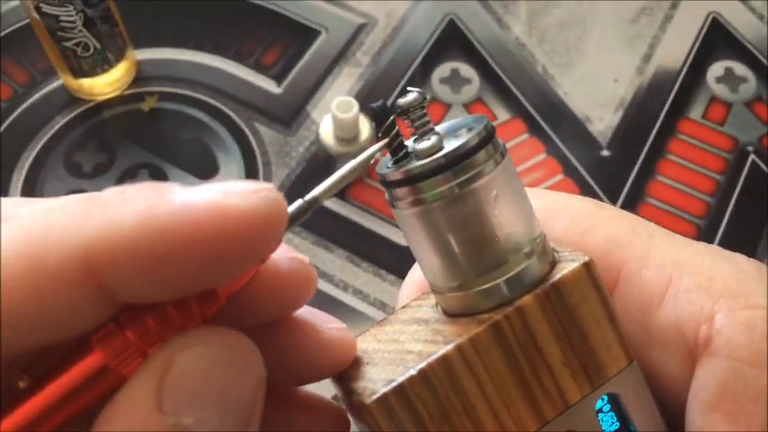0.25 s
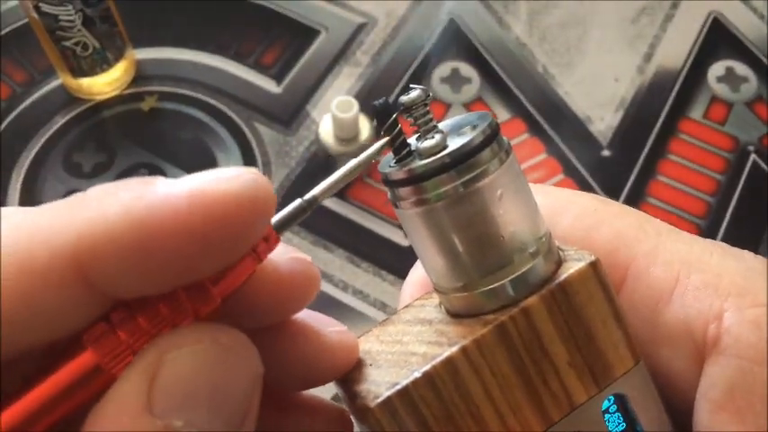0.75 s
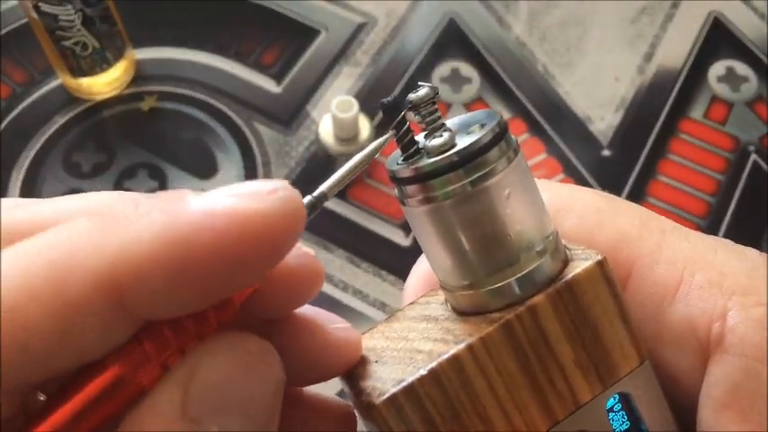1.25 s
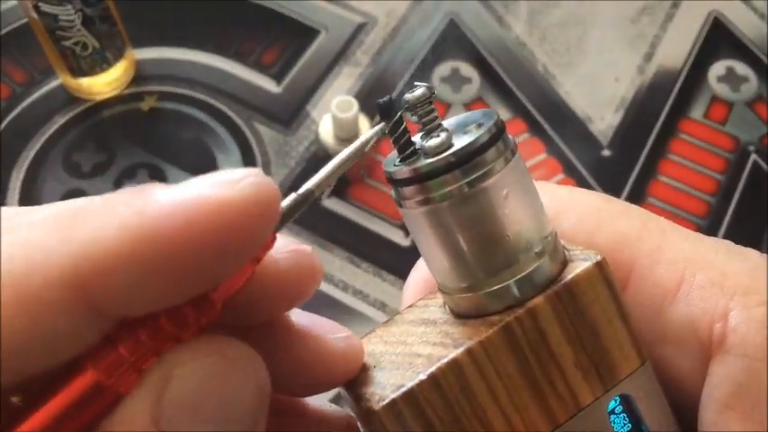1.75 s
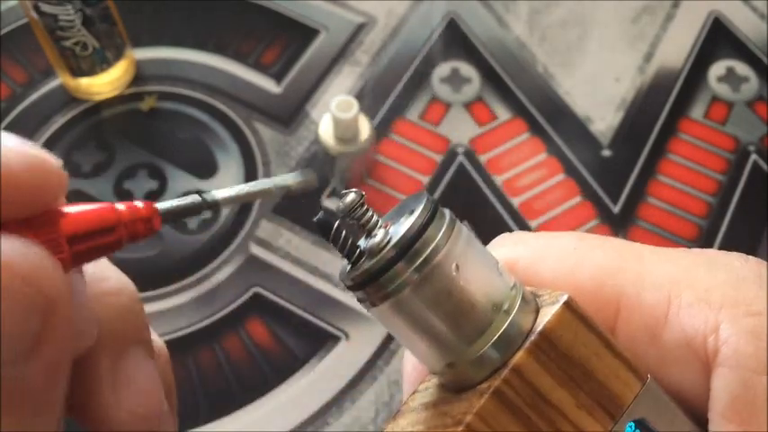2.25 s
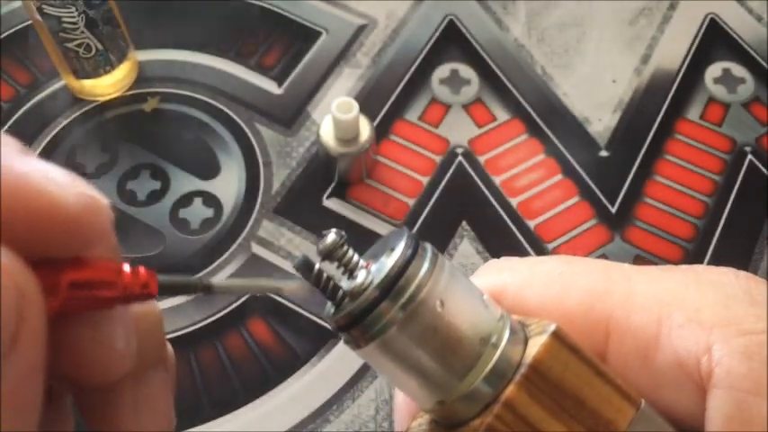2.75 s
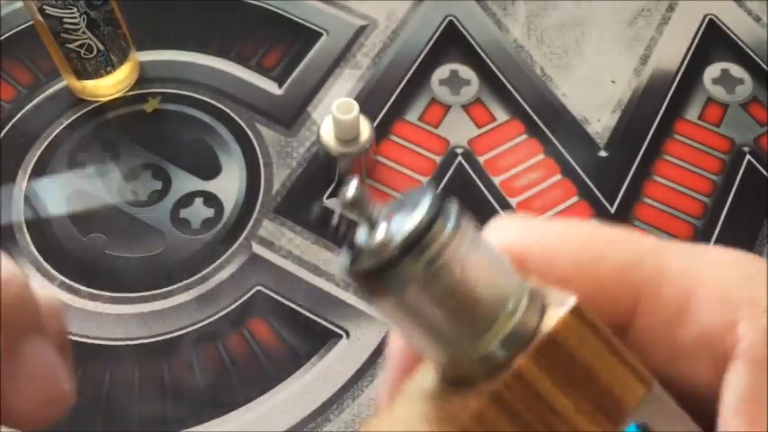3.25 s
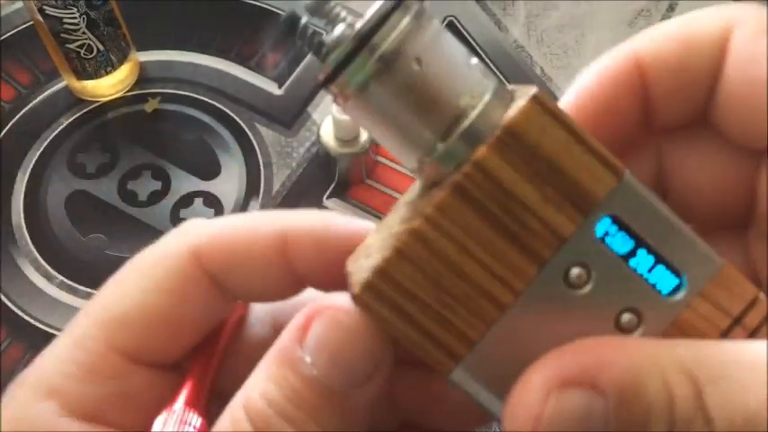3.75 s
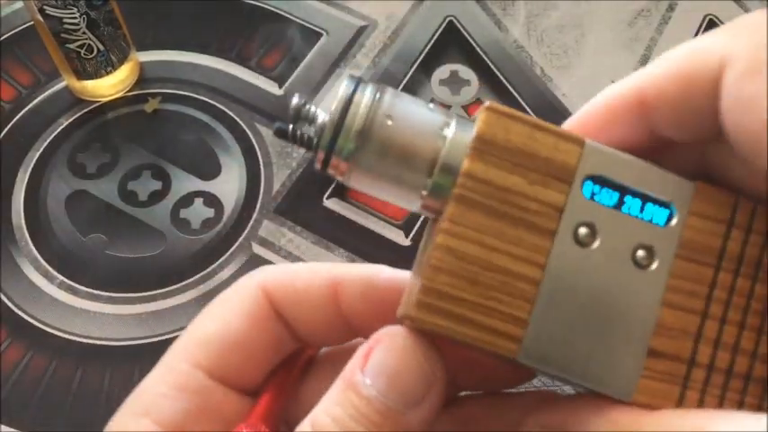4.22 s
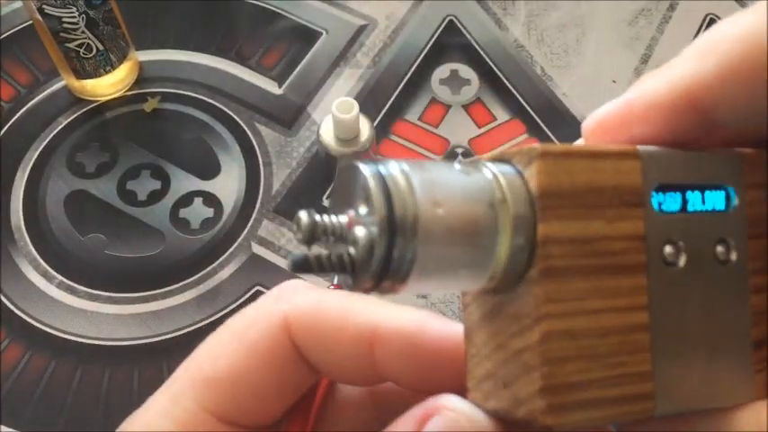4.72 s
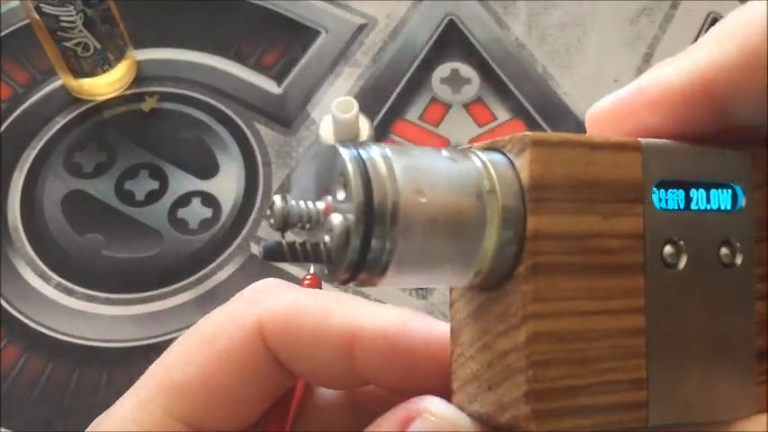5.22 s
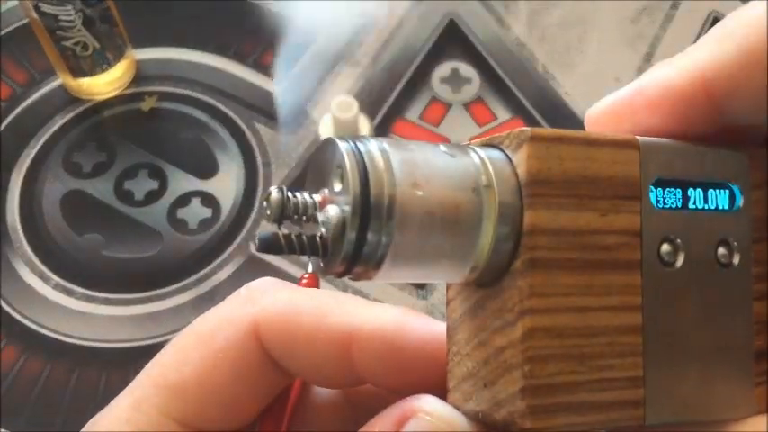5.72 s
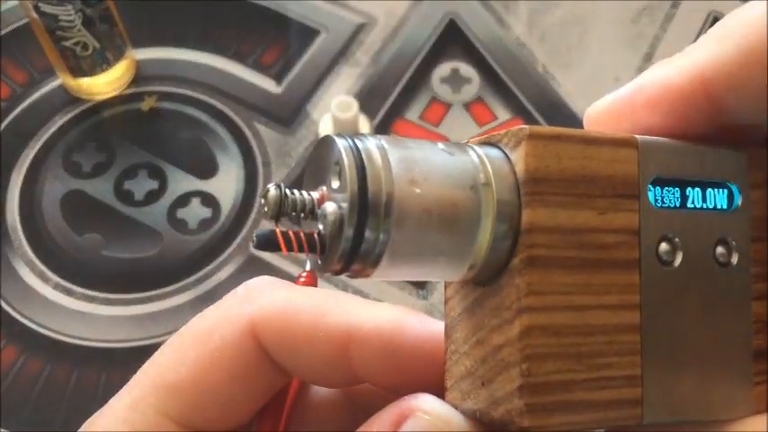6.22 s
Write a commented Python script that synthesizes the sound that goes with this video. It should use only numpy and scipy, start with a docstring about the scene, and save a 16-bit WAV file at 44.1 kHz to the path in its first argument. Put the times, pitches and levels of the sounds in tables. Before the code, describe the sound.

Very close microphone in a quiet room. A wet hot coil sizzles with bright, sharp pops, densest in the first second, then thinning. A metal tool tip ticks and scrapes against the coil with short steely rings around three seconds. Small handling knocks follow, one sharp crack, then a gritty hiss of vapour swells quickly and dries out. A faint, deep throbbing hum lies beneath.

```python
"""Sizzling coil on a steel post

A wet heating coil on a hand-held steel post spits and sizzles close by in a quiet room: bursts over hiss.
A screwdriver tip grinds (rough noise) and skips over the coil and rings the steel (fading tones).
Knocks, low thumps and a short ping are dying noise in a resonance; a late surge of vapour is gritty noise.
A low hum sinks in pitch and throbs as two tones drift apart; room rumble and hiss lie beneath."""
import sys
import numpy as np
from scipy import signal
from scipy.fft import rfft, irfft, next_fast_len
from scipy.io import wavfile
from scipy.ndimage import uniform_filter1d, map_coordinates

SR = 44100
rng = np.random.default_rng(int(sys.argv[2]) if len(sys.argv) > 2 else 0)


def file_out(sig):
    """Save sig as 16-bit WAV at sys.argv[1]."""
    # one column per channel
    cols = np.atleast_2d(sig).T
    # limit, then scale
    lim = np.clip(cols, -1, 1)
    pcm = np.round(lim * 32767).astype(np.int16)
    wavfile.write(sys.argv[1], SR, pcm)


N = 285723  # length in samples


def amp(db):
    """Turns decibels into a gain."""
    return 10 ** (np.asarray(db) / 20)


def unit(x):
    """Scales x to an rms (average strength) of 1."""
    return x / np.sqrt(np.mean(x ** 2) + 1e-20)


def curves(rows):
    """Joins the rows by straight lines: one curve for each column after the time."""
    s, *columns = np.transpose(rows)
    return [np.interp(np.arange(N) / SR, s, column) for column in columns]


def wobble(rate):
    """A smooth random curve with this many random points a second."""
    points = rng.standard_normal(int(N * rate / SR) + 4)
    return map_coordinates(points, [np.arange(N) * rate / SR])


def filtered(x, response):
    """Multiplies the spectrum of x by a response to frequency."""
    m = next_fast_len(N + SR // 2)
    return irfft(rfft(x, m) * response(np.fft.rfftfreq(m, 1 / SR)), m)[..., :N]


def lifted(peaks):
    """A response with a bump at each (centre Hz, width Hz, lift dB)."""
    return lambda f: amp(sum(db / (1 + ((f - c) / w) ** 2) for c, w, db in peaks))


def coloured(x, points):
    """Shapes x by a spectrum of (Hz, dB) points and scales it to rms 1."""
    f, db = np.transpose(points)
    return unit(filtered(x, lambda hz: amp(np.interp(np.log(hz + 1), np.log(f), db))))


def bursts(s, db, hz, tail_db, t60, size):
    """Each burst is one pressure cycle followed by scattered reflections off hands and table."""
    lead = 12  # samples before the middle of the cycle
    t = np.arange(size) / SR
    u = (t - lead / SR) * 2 * np.pi * hz[:, None]
    cycle = -u * np.exp((1 - u ** 2) / 2)
    scatter = np.diff(rng.standard_normal((len(s), size + 1)), axis=1)
    tail = amp(tail_db - 60 * t / t60) * scatter * (u > 2)
    at = np.round(s * SR).astype(int)[:, None] + np.arange(size) - lead
    sound = amp(db)[:, None] * (cycle + tail)
    return np.bincount(np.clip(at, 0, N).ravel(), sound.ravel(), N + 1)[:N]


def bubbles(count, centre_hz, spread_db, hiss_db):
    """A random rain of small bursts over steam hiss, rms 1; a few are much louder than the rest."""
    chance = rng.random((count, 3))
    s = chance[:, 0] * N / SR
    hz = centre_hz * 2 ** (1.88 * (chance[:, 1] - .5))
    db = -spread_db * np.log(chance[:, 2] + 0.0042)
    grains = bursts(s, db, hz, tail_db=-11.0, t60=0.0066, size=96)
    band = lambda f: (f / centre_hz) ** 1.14 / (1 + (f / centre_hz) ** 2.28)
    hiss = unit(filtered(rng.standard_normal(N), band))
    return unit(unit(grains) + amp(hiss_db) * hiss)


# Liquid simmering on the hot coil, before spurts and colouring. Each row: time in seconds, level in dB.
SIMMER = [(0.0, -63), (0.64, -54), (0.9, -57.5), (2.04, -65), (2.8, -68), (3.16, -57), (3.56, -66.5),
          (4.53, -69), (4.87, -66), (5.15, -64), (5.9, -68), (6.15, -77.5), (6.48, -84)]
# Single pops and ticks, loud and faint, before colouring.
# Each row: time in seconds, peak of the pressure cycle in dB, centre in Hz.
POPS = [(0.1428, -27.5, 10300), (0.2608, -18, 11730), (0.4284, -22.5, 9100), (0.4415, -15, 10900),
        (0.4701, -15.5, 9600), (0.5036, -24.5, 11000), (0.5126, -24.5, 5140), (0.5264, -32, 6200),
        (0.5861, -17.5, 9200), (0.602, -31.5, 5500), (0.6236, -30, 11700), (0.6609, -27, 9500),
        (0.673, -31, 7000), (0.6849, -21.5, 8460), (0.708, -33, 9000), (0.7475, -24.5, 9100),
        (0.761, -30, 8500), (0.7808, -27, 5830), (0.8265, -27, 8450), (0.9144, -23, 12500),
        (0.994, -27.5, 8860), (1.0643, -24.5, 12500), (1.16, -24, 13300), (1.2187, -28.5, 11700),
        (1.2517, -24.5, 11700), (1.3284, -30.5, 11050), (1.3467, -26, 11100), (1.405, -23.5, 11500),
        (1.5195, -26.5, 16800), (1.5501, -31.5, 13300), (1.792, -26.5, 8400), (3.568, -38, 3920),
        (3.758, -39, 7000), (3.8518, -37.5, 5160), (4.6111, -29.5, 8500), (4.7294, -38, 4960),
        (4.815, -37, 7000), (4.8763, -37, 8000), (5.1994, -37, 7680), (5.301, -26.5, 10860),
        (5.4196, -25.5, 11000), (5.6065, -25, 7500), (5.715, -21.5, 11720), (5.899, -36, 11100),
        (6.0777, -34.5, 13900)]
# Resonances of the cup around the coil. Each row: centre in Hz, width in Hz, lift in dB.
CUP = [(4210, 56, 2.5), (12230, 750, 5)]
# Finer resonances while the tip rests beside the coil. Each row: centre in Hz, width in Hz, lift in dB.
BESIDE = [(1350, 190, 4.5), (2193, 115, 8), (4460, 93, 6.5), (8630, 120, 5), (9360, 280, 3.5),
          (11460, 220, 6.5), (12900, 150, 4.5), (13750, 170, 5.5), (14800, 200, 7)]
# Base levels of big bubbles and of lone clear ticks, and the share of the simmer's dB swing they follow.
COARSE_DB, COARSE_FOLLOWS = -70.5, 0.61
TICK_DB, TICK_FOLLOWS = -67, 0.67
TIP_AWAY_S, TIP_LEAVES_S = 2.32, 0.18  # the tip is drawn back, and how long that takes
# An echo off the moving hands: middle delay, level, and random swing of the delay as a ratio in dB.
HAND_ECHO_S, HAND_ECHO_DB, HAND_MOVES_DB = 0.000503, -6.5, 3


def coil():
    """Liquid boils off the wire in spurts; the cup around it colours every burst."""
    simmer_db, = curves(SIMMER)
    swing_db = simmer_db - simmer_db.mean()
    coarse_db = COARSE_DB + COARSE_FOLLOWS * swing_db
    tick_db = TICK_DB + TICK_FOLLOWS * swing_db
    spurts_db = 2.73 * wobble(14) + 2.43 * wobble(70)
    fine = bubbles(count=5000, centre_hz=12800, spread_db=4.5, hiss_db=-5.5)
    fine *= amp(simmer_db + spurts_db)
    coarse = bubbles(count=900, centre_hz=3310, spread_db=1.8, hiss_db=-4.5)
    coarse *= amp(coarse_db + 0.87 * spurts_db)
    ticks = amp(tick_db) * bubbles(count=1300, centre_hz=8700, spread_db=3.0, hiss_db=-16)
    pops = bursts(*np.transpose(POPS), tail_db=-20.5, t60=.012, size=700)
    boil = filtered(fine + coarse + ticks + pops, lifted(CUP))
    lag = SR * HAND_ECHO_S * amp(HAND_MOVES_DB * wobble(2.5))  # in samples
    with_echo = boil + amp(HAND_ECHO_DB) * map_coordinates(boil, [np.arange(N) - lag])
    beside_tip = filtered(boil, lifted(BESIDE))
    away = np.clip((np.arange(N) / SR - TIP_AWAY_S) / TIP_LEAVES_S, 0, 1)
    return away * amp(-1) * with_echo + (1 - away) * amp(-2) * beside_tip


# Relative spectrum of the vapour jet. Each row: frequency in Hz, level in dB per Hz.
JET = [(1500, -40), (3100, -11), (4900, -8.5), (6000, -1.5), (9000, 1), (16000, -1.5)]
FIRE_ON_S, FIRE_PEAK_S, FIRE_OFF_S = 5.197, 5.45, 5.915  # current flows, wick is hottest, current stops
# Level at the peak before flicker and echo, its rise, and its fall as the wick dries.
FIRE_DB, SWELL_DB_PER_S, DRY_DB_PER_S = -49, 27, 21
DRY_OUT_S, DRY_OUT_DB_PER_S = 5.74, 34  # the last liquid runs out: extra fall from here
TABLE_S, TABLE_DB = 0.000336, -12  # the jet's echo off the table top


def vapour():
    """Fierce boiling merges into a gritty hiss: noise with a wildly varying level, plus one echo."""
    grit = rng.standard_normal(N) * amp(7.6 * rng.standard_normal(N) + 1.8 * wobble(300))
    t = np.arange(N) / SR
    echo = lambda f: 1 + amp(TABLE_DB) * np.exp(-2j * np.pi * f * TABLE_S)
    jet = filtered(coloured(grit, JET), echo)
    late = t - FIRE_PEAK_S
    jet_db = FIRE_DB + SWELL_DB_PER_S * np.minimum(late, 0) - DRY_DB_PER_S * np.maximum(late, 0)
    jet_db -= DRY_OUT_DB_PER_S * np.maximum(t - DRY_OUT_S, 0)
    current_on = (t > FIRE_ON_S) & (t < FIRE_OFF_S)
    return current_on * amp(jet_db + 2.2 * wobble(70)) * jet


# Contacts of the tip with the steel. Each row: time in seconds, nominal blow level in dB,
# nominal ring level in dB, lean from the low to the middle ring in dB.
TAPS = [(2.335, -80, -47, 5), (2.352, -54, -44, 4), (2.448, -74, -52, 15), (2.891, -37, -41, 2),
        (2.8961, -31, -34, -5), (2.9156, -33, -34, -3.5), (2.936, -49, -41, 0), (3.066, -40, -50, -20),
        (3.075, -57, -45, 0), (3.083, -51, -39, -7), (3.0875, -31, -28, 1), (3.095, -34, -42, -4),
        (3.0992, -25.5, -33, 3), (3.1116, -35, -29, -1), (3.1152, -35.5, -37.5, 8),
        (3.125, -50, -51, -17.5), (3.140, -55, -51, -8.5), (3.261, -33, -53, -12), (3.266, -48, -37, -5),
        (3.2698, -31.5, -38, -2), (3.291, -42, -34, 5), (3.2954, -28.5, -33.5, 2), (3.301, -44, -36, -4),
        (3.3068, -38, -32, 1.5), (3.3205, -58, -47, -6), (3.581, -71, -44.5, -1), (3.59, -70, -44.5, -2),
        (3.6, -59, -40.5, 9), (3.645, -48, -40.5, 10), (3.665, -44, -54, 8), (3.6746, -36.5, -32, 13),
        (3.767, -43, -31.5, 9)]
# Modes (natural tones) of the steel, in four groups: with the blow, low, middle and high ring.
# Each row: nominal pitch in Hz, relative level in dB, time in seconds to fall 60 dB before damping.
STEEL = [
    [(2486, -8, 0.038), (4450, 0, 0.026), (4890, 8.5, 0.008), (12400, -0.5, 0.0079)],
    [(3430, -3, 0.091), (3760, -1.5, 0.021)],
    [(5920, 2, 0.031)],
    [(13550, -1.5, 0.035), (13160, -6, 0.019)],
]
# Tank tones shaken under pressure. Each row: pitch in Hz, level against the blow in dB, 60 dB fall in seconds.
TANK = [(111, -16, 0.045), (594, -18, 0.044), (962, -19, 0.048)]
# The tip is pushed against the coil between these two times: start in seconds, end in seconds.
PRESSED = (2.85, 3.305)
GRIP_S = 3.72  # a hand closes on the steel
# Extra damping when pressed or gripped, as the 60 dB fall time it would give alone.
PRESSED_T60_S, GRIP_T60_S = 0.054, 0.03
HELD_DETUNE_HZ, FREE_DETUNE_HZ = 132, 24  # the pitch of held steel scatters more
HIGH_PRESSED_DB, HIGH_FREE_DB = 5, -3  # the high ring, over the mean of blow and ring
RING_SHARE = 0.7  # share of each mode's fall time that remains


def screwdriver():
    """Each contact cracks and rings the steel modes; holding damps them, pressure shakes the tank."""
    out, t = np.zeros(N + SR), np.arange(SR // 8) / SR
    for s, blow_db, ring_db, lean_db in TAPS:
        pressed = PRESSED[0] < s < PRESSED[1]
        high_db = (blow_db + ring_db) / 2 + (HIGH_PRESSED_DB if pressed else HIGH_FREE_DB)
        levels = blow_db, ring_db - lean_db / 2, ring_db + lean_db / 2, high_db
        damping, detune_hz = 0, FREE_DETUNE_HZ
        if pressed or s > GRIP_S:
            damping = 1 / (PRESSED_T60_S if pressed else GRIP_T60_S)
            detune_hz = HELD_DETUNE_HZ
        rise = 1 - np.exp(-t / (0.00029 * amp(-.6 * (max(levels) + 25.0))))  # light contacts are slower
        sound = amp(blow_db + 4.5 - 60 * t / 0.0068) * np.diff(rng.standard_normal(len(t) + 1))
        for db, group in zip(levels, STEEL):
            for hz, mode_db, t60 in group:
                drift = 0.091 * np.cumsum(rng.standard_normal(len(t)))  # scraping roughens the ring
                fall_db = 60 * t * (1 / (t60 * RING_SHARE) + damping)
                fade = amp(-fall_db) + amp(-21 - 0.28 * fall_db)  # a faint part lingers
                size = amp(db + mode_db + rng.normal(0, 1.9)) * fade
                pitch_hz = hz + detune_hz * rng.normal()
                sound += size * np.sin(2 * np.pi * pitch_hz * t + drift)
        for hz, mode_db, t60 in TANK if pressed else []:
            sound += amp(blow_db + mode_db - 60 * t / t60) * np.sin(2 * np.pi * hz * t)
        out[round(s * SR):][:len(t)] += rise * sound
    return out[:N]


# The tip grinds along the wire. Each row: start in seconds, length before the fade in seconds, level in dB
# (a scale for noise whose rms over the whole scene is 1).
RASPS = [(2.89, .028, -51), (3.067, 0.073, -48), (3.26, 0.049, -51)]
RASP_WIDTH_HZ, RASP_FADE_S = 140, 0.015  # blur of each steel mode; time to fade to about a third


def rasp():
    """Gritty friction, heard through the blurred modes of the steel."""
    t = np.arange(N) / SR
    grit = rng.standard_normal(N) * amp(5.2 * wobble(400))
    modes = [(hz, RASP_WIDTH_HZ, 14) for group in STEEL for hz, _, _ in group]
    steel = unit(filtered(grit, lambda f: lifted(modes)(f) * f / (f + 3000)))
    strokes = np.zeros(N)
    for s, length, db in RASPS:
        fade = np.exp(-np.maximum(t - s - length, 0) / RASP_FADE_S)
        strokes += amp(db) * (t > s) * fade
    return strokes * steel


# Knocks, low thumps, a short ping near the end and the body of the gripped tap.
# Each row: start in seconds, peak in dB, centre in Hz,
# time in seconds for the main noise to fall 60 dB, sharpness of the resonance (no unit).
KNOCKS = [(3.7681, -38.5, 2470, 0.02, 4.2), (3.769, -33, 4640, 0.025, 2.2), (4.257, -44.5, 490, 0.039, .8),
          (4.258, -43.5, 1810, 0.097, 1.1), (4.8196, -21, 2850, 0.0075, 0.75),
          (4.819, -42, 880, 0.13, 0.66), (5.03, -53.5, 139, 0.055, 1.5), (5.29, -51, 145, 0.065, 1.9),
          (5.761, -46, 3430, 0.018, 13)]


def knocks():
    """Knocks, thumps and a ping: a dying noise passes twice through one resonance."""
    out, t = np.zeros(N + SR), np.arange(SR // 8) / SR
    for s, db, hz, t60, sharpness in KNOCKS:
        b, a = signal.iirpeak(hz, sharpness, SR)
        fade = amp(-60 * t / t60) + amp(-26.5 - 60 * t / 0.21)  # a faint part lingers
        noise = rng.standard_normal(len(t)) * fade
        knock = signal.lfilter(np.convolve(b, b), np.convolve(a, a), noise)
        out[round(s * SR):][:len(t)] += amp(db) * knock / np.abs(knock).max()
    return out[:N]


# Two low tones that beat. Each row: time in seconds, sinking tone in dB rms, steady tone in dB rms.
HUM = [(0, -57.5, -52), (.32, -58, -47.5), (1, -59.5, -54), (1.4, -58.5, -59), (2.3, -56.5, -57.5),
       (3.2, -55, -62), (3.7, -76, -75), (4.2, -71, -78), (4.9, -68, -61), (5.7, -58.5, -75),
       (6, -69.5, -75), (6.48, -66, -81)]
# The sinking tone falls behind the steady one; at odd half cycles they oppose each other.
# Each row: time in seconds, cycles behind (corners are smoothed).
BEHIND = [(.25, 0), (.97, .5), (1.88, 2.5), (2.16, 3.5), (2.6, 5.5), (3.05, 7.5), (3.35, 9.5), (6.48, 35)]
STEADY_HZ = 56.9
# A lower tone swells and fades: middle, half-width of the swell, peak dB rms, pitch at the middle, glide.
THIRD_S, THIRD_LASTS_S, THIRD_DB, THIRD_HZ, THIRD_HZ_PER_S = 4.9, 0.55, -68, 43.16, -4


def hum():
    """A tone sinks away from a steady one, so their sum throbs; a third passes late, over a fuzzy drone."""
    sinking_db, steady_db = curves(HUM)
    t = np.arange(N) / SR
    lost_cycles = uniform_filter1d(curves(BEHIND)[0], size=SR // 8)
    sinking = amp(sinking_db) * np.sin(2 * np.pi * (STEADY_HZ * t - lost_cycles))
    steady = amp(steady_db) * np.sin(2 * np.pi * STEADY_HZ * t)
    drone = amp(-70.0) * coloured(rng.standard_normal(N), [(30, -27), (43, 3.0), (60, -6.0), (75, -30.0)])
    u = t - THIRD_S
    swell = np.exp(-(u / THIRD_LASTS_S) ** 2)
    third_cycles = (THIRD_HZ + THIRD_HZ_PER_S * u / 2) * u
    third = amp(THIRD_DB) * swell * np.sin(2 * np.pi * third_cycles)
    return np.sqrt(2) * (sinking + steady + third) + drone  # root 2 turns rms into peak


# Relative spectrum of the room. Each row: frequency in Hz, level in dB per Hz.
ROOM = [(35, -24), (65, 4.5), (110, -4.5), (240, -4), (500, -16.5), (1000, -14), (3500, -25), (16000, -56)]


def room():
    """Indoor rumble and hiss: shaped noise whose level wavers gently."""
    return amp(-68.5 + 1.17 * wobble(5.8)) * coloured(rng.standard_normal(N), ROOM)


def scene():
    """All sources added together at one microphone."""
    return (coil() + vapour() + screwdriver() + rasp() + knocks() + hum() + room())[None]


TOP_HZ = 15830  # band limit


def record(dry):
    """The recorder cuts very steeply above its band limit."""
    return filtered(dry, lambda hz: 1 / (1 + (hz / TOP_HZ) ** 200))


dry = scene()
out = record(dry)
file_out(out)
```